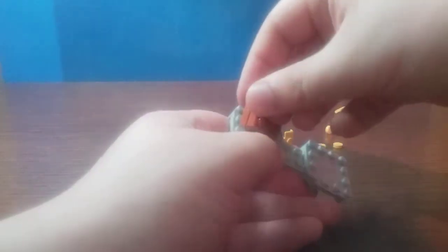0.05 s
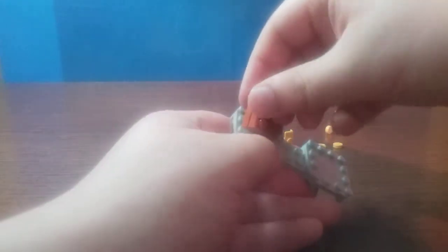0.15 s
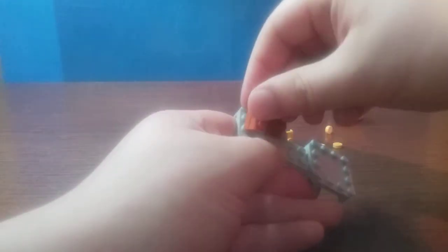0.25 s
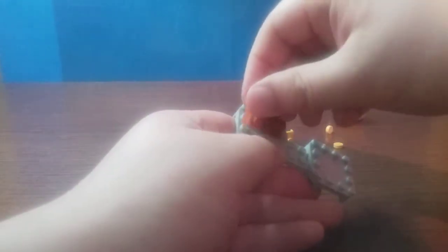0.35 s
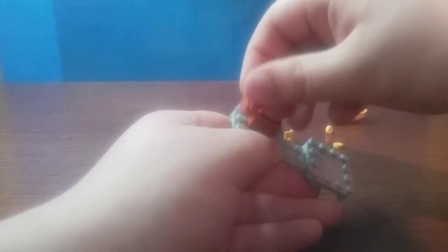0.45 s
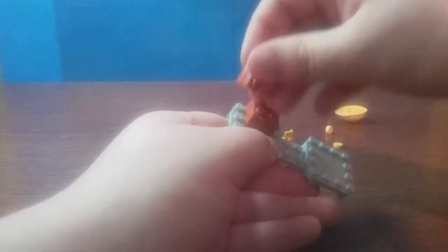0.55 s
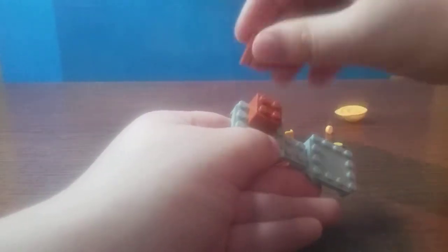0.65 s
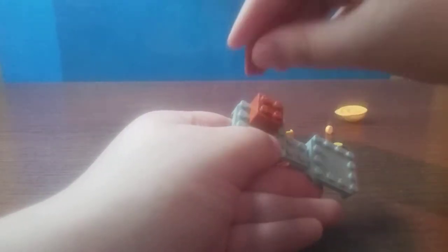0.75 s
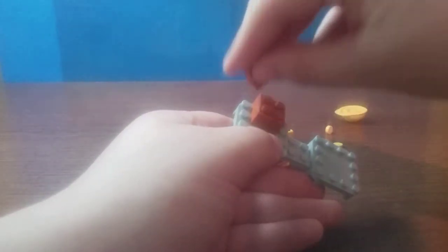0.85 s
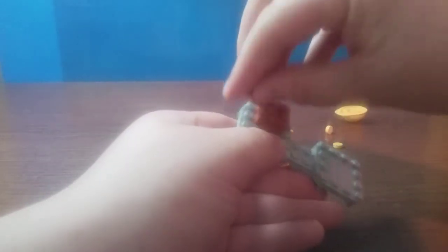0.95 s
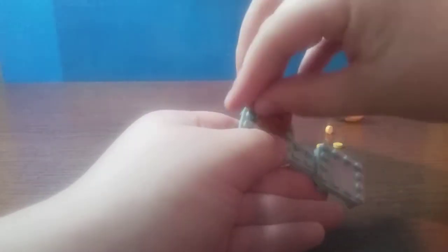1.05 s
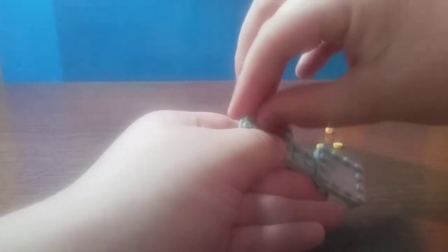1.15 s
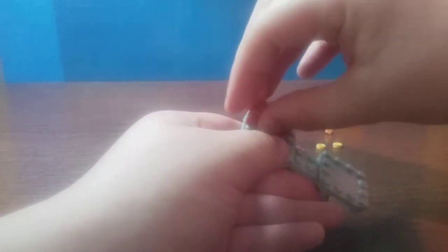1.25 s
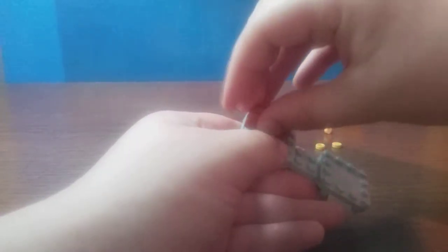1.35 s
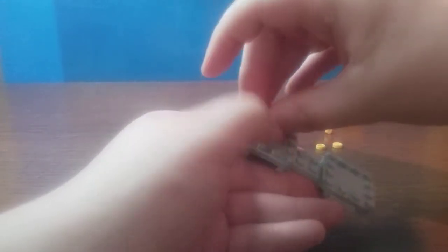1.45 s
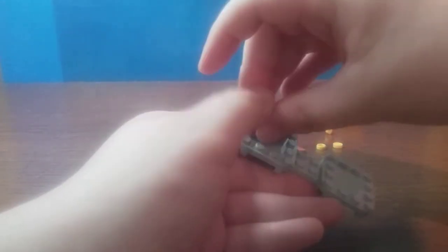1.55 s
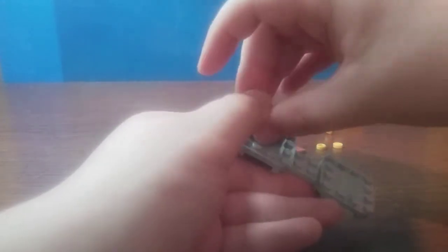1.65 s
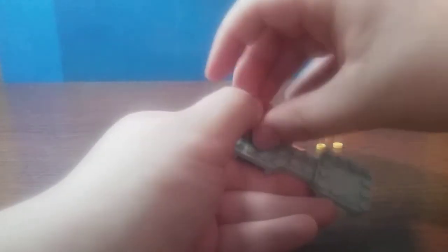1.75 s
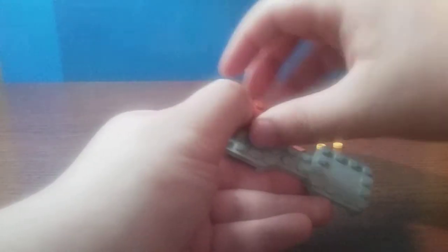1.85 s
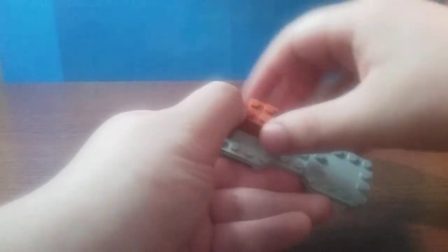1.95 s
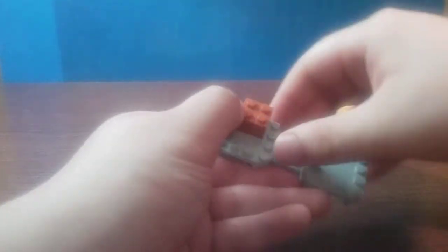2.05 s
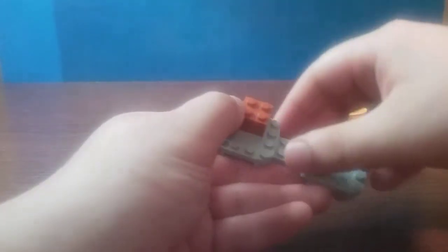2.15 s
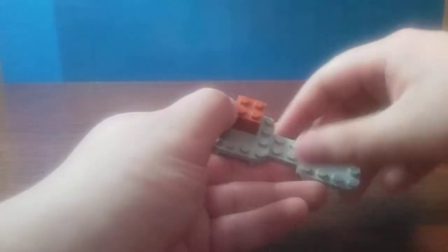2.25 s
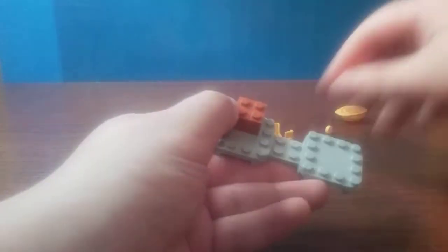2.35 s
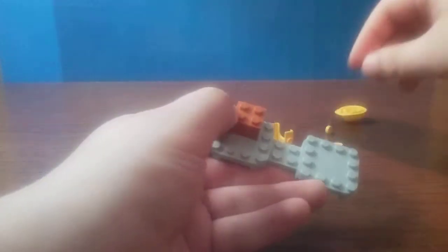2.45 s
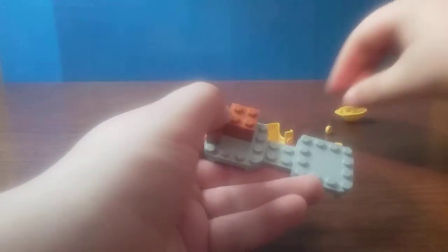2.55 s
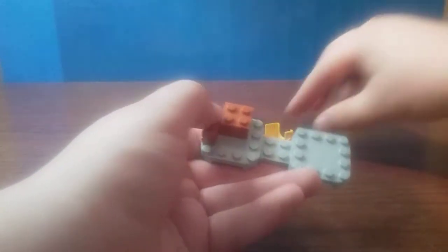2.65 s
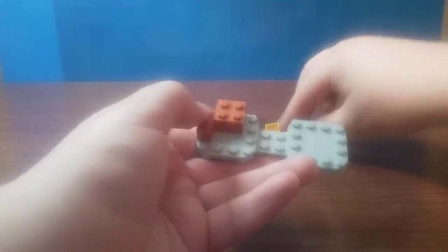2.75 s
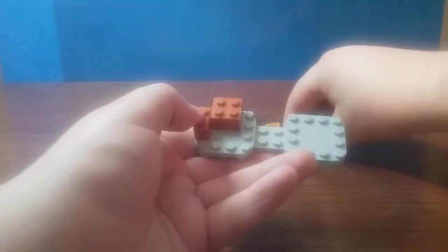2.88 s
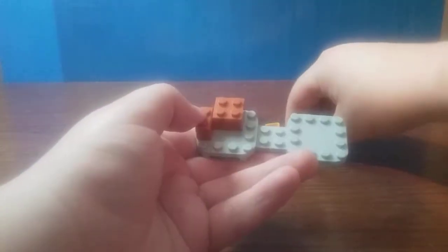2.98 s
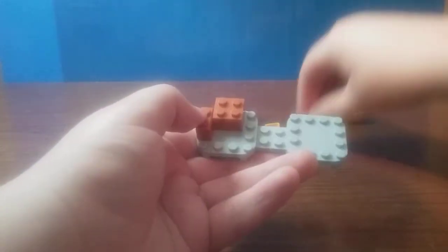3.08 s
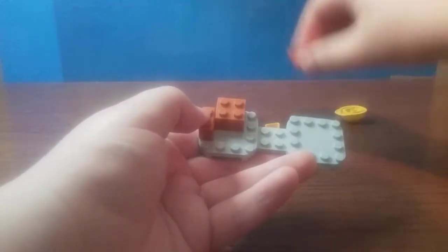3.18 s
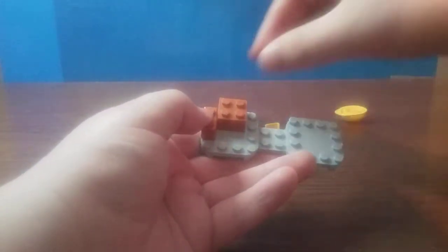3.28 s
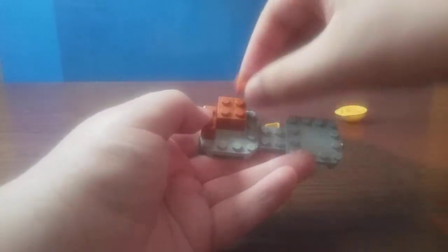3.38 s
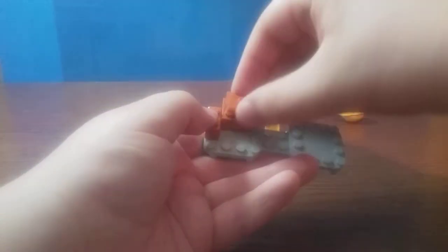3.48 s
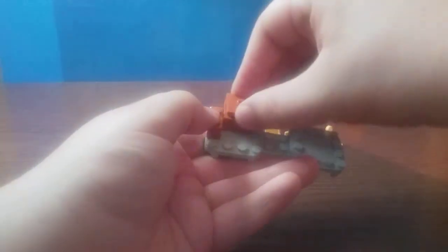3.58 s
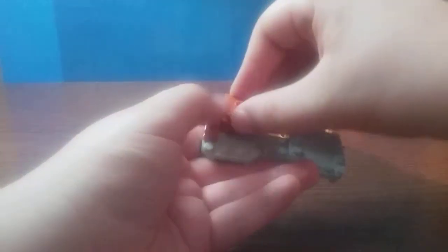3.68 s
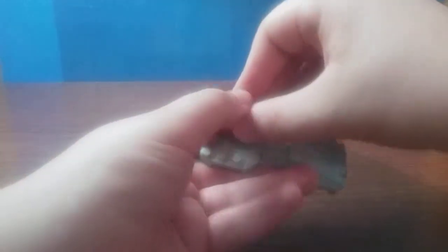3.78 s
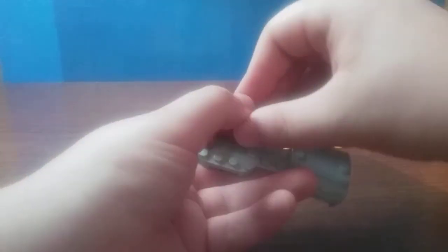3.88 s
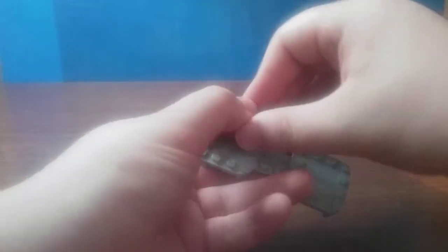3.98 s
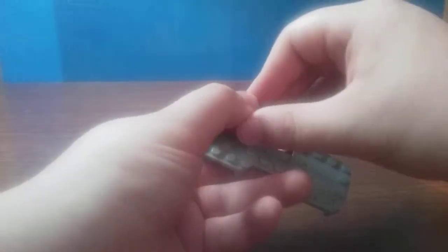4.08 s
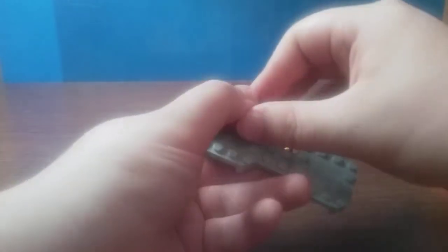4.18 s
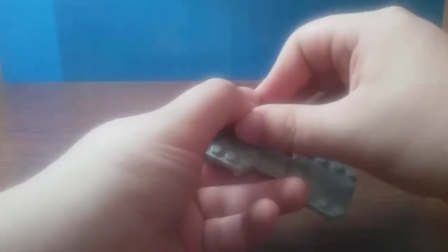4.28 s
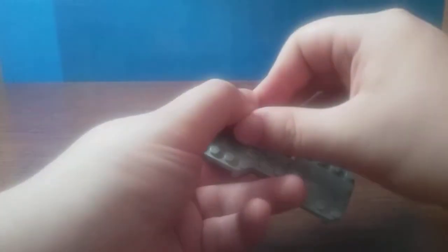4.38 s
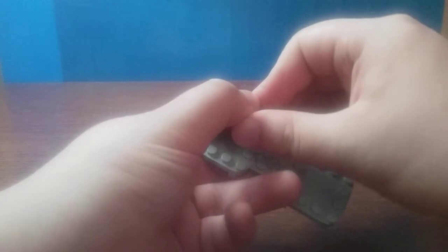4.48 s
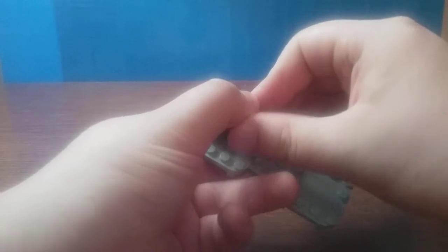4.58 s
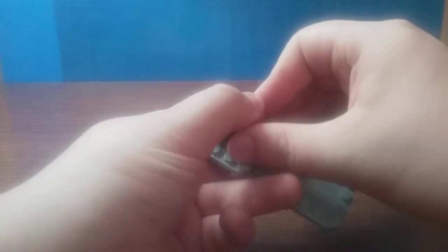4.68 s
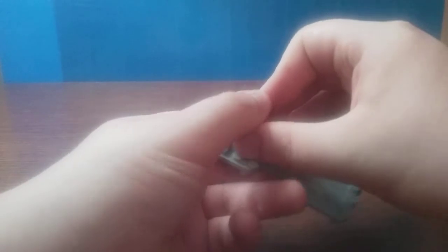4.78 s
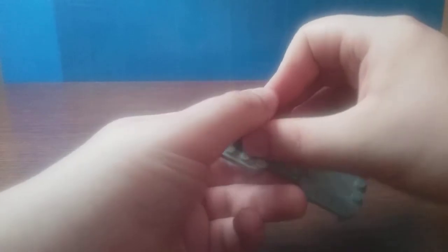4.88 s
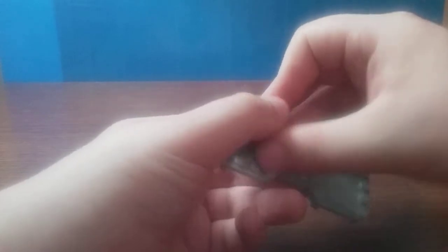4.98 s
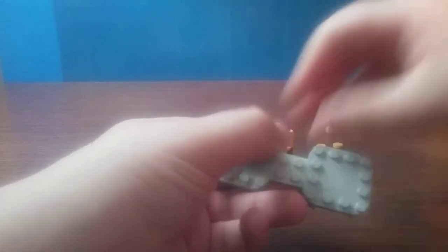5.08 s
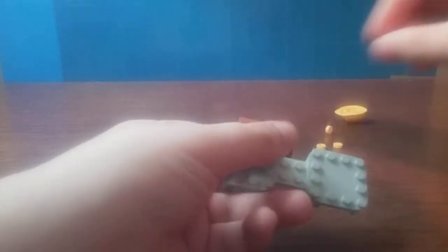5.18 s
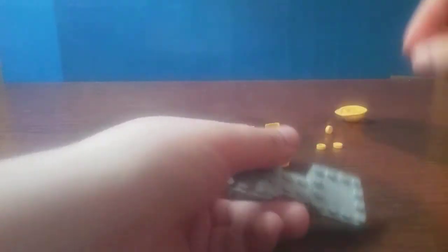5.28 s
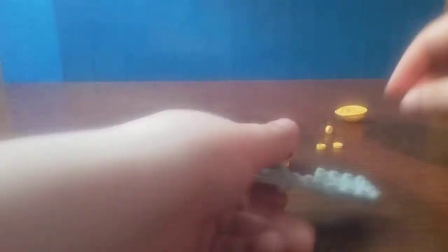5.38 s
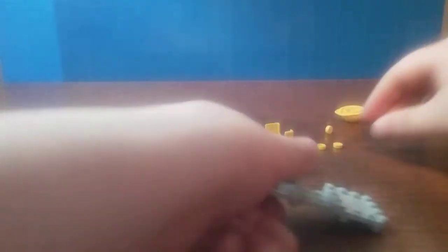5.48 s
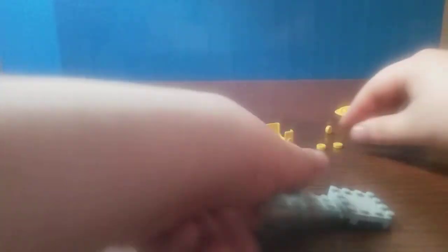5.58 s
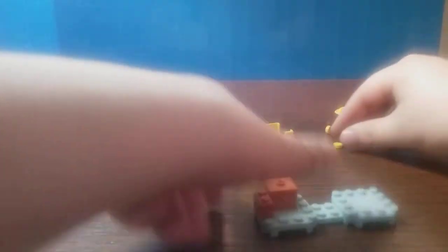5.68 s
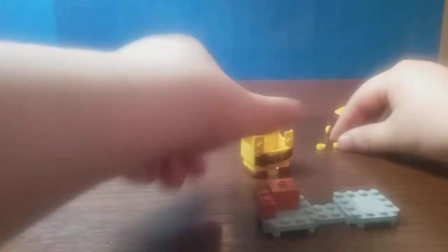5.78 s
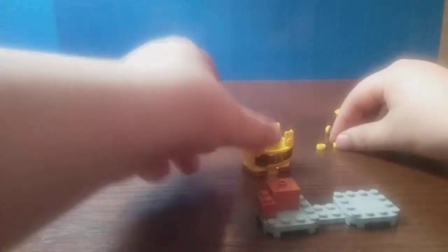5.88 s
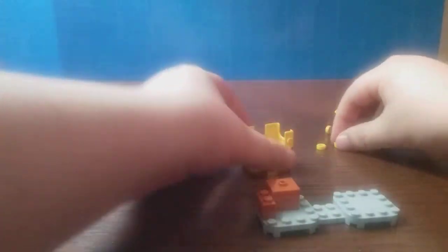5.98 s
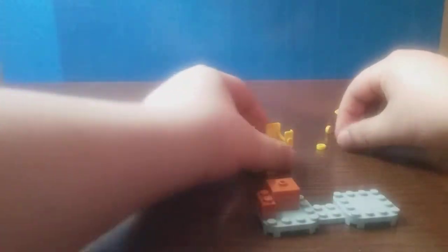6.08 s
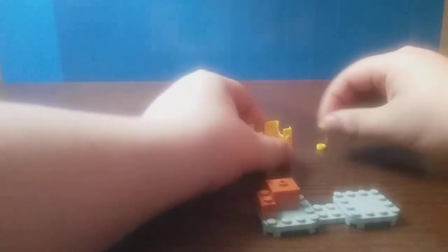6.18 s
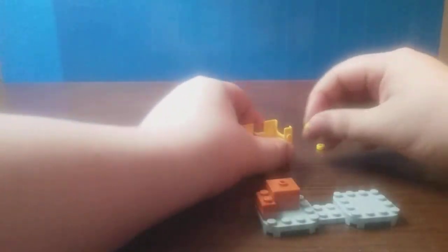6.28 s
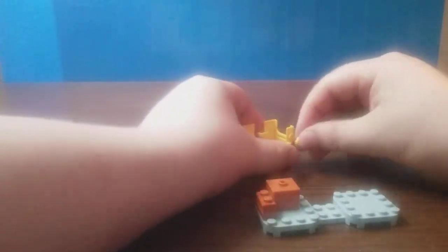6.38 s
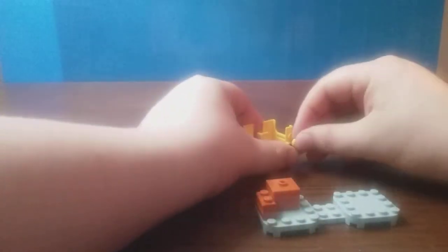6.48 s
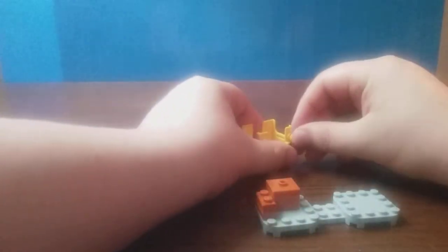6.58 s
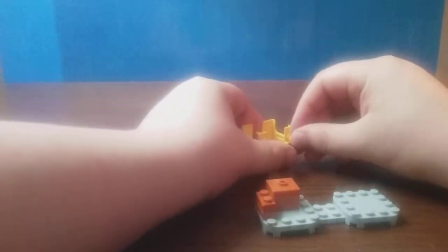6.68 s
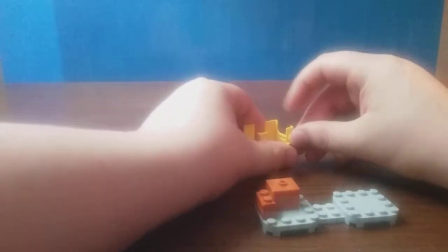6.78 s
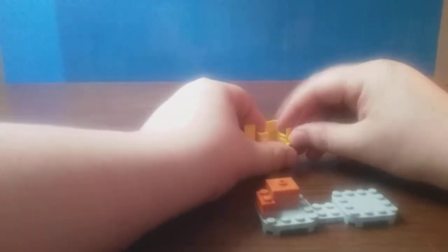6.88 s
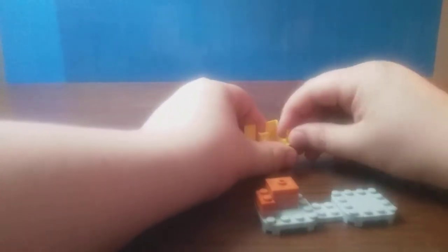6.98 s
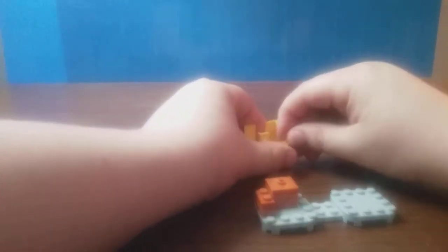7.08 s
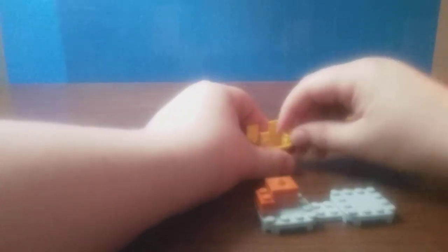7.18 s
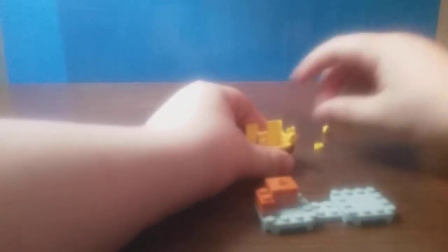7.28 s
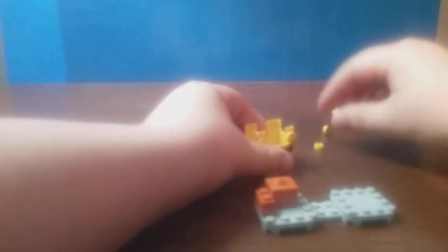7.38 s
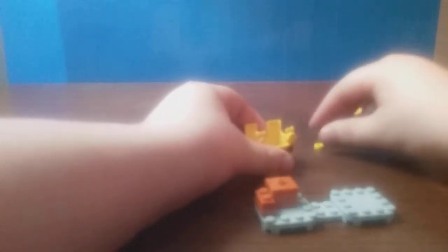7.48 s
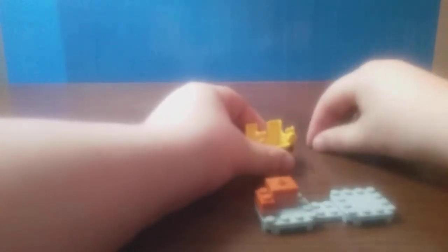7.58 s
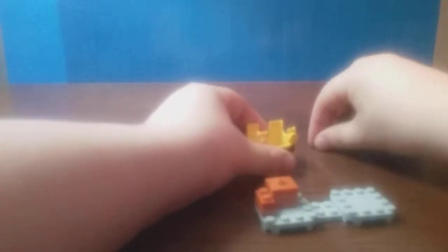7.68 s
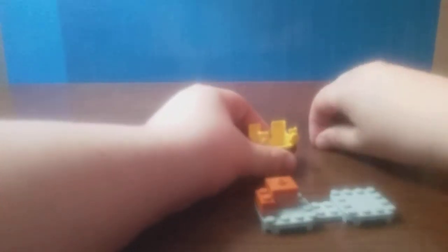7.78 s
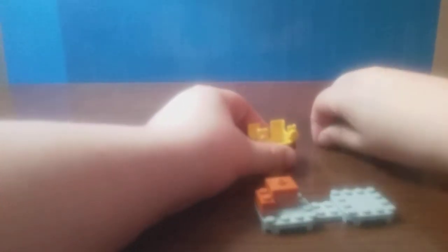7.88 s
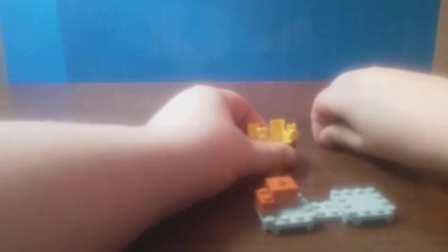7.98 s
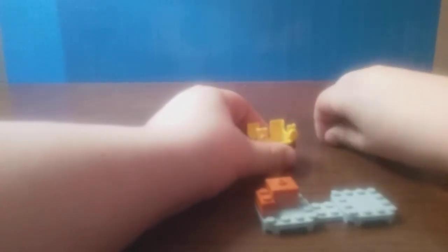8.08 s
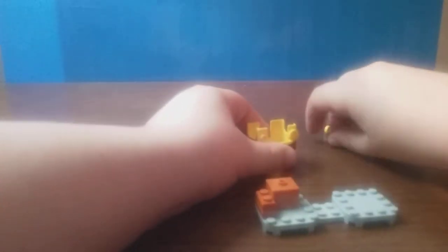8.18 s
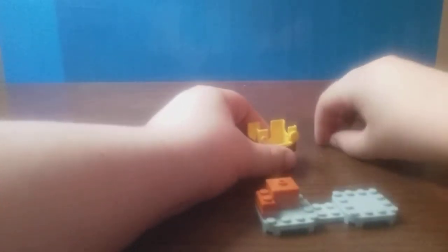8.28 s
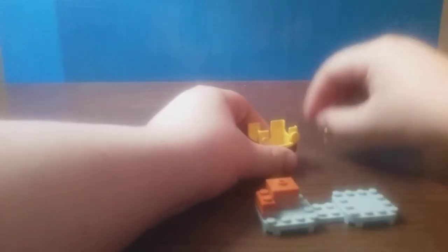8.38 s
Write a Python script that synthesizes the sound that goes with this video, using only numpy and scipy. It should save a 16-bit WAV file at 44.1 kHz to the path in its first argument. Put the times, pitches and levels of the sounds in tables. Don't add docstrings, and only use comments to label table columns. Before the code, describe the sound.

Close on a wooden table in a small room, hands join small plastic bricks with sparse, bright snaps and faint ticks. A firm double click seats a stud midway. Then a flat piece smacks down and a taller one lands, rocks and bounces in a quick, loud clatter. Afterwards come low forearm thumps, a few clicks, nudges and dull finger knocks over soft hiss and a barely audible hum.

```python
import sys
import numpy as np
from scipy import signal
from scipy.fft import rfft, irfft, next_fast_len
from scipy.io import wavfile
from scipy.ndimage import uniform_filter1d, map_coordinates

SR = 44100
rng = np.random.default_rng(int(sys.argv[2]) if len(sys.argv) > 2 else 0)


def to_wav(s):
    ch = np.atleast_2d(s).T
    pcm = np.round(np.clip(ch, -1, 1) * 32767)
    wavfile.write(sys.argv[1], SR, pcm.astype(np.int16))


def volts_from_db(level):
    exponent = np.asarray(level, float) / 20
    return 10 ** exponent


N = 372202
SIZE = 16384

# freq_hz, density_db
HISS = [(12, -40.5), (30, -24), (55, 4), (120, -9), (250, -10), (500, -13.5), (1000, -17), (2200, -20),
        (4000, -24.5), (7500, -31), (10500, -31.5), (14500, -28), (15700, -28.5), (16100, -71)]
# freq_hz, rms_db, waver_hz
HUM = [(55, -86.5, 6.9), (118, -85, 5.1), (237.6, -80.5, 3.1), (474, -89, 4.2)]
# freq_hz, t60_s
ROOM_DECAY = [(150, 0.12), (1000, .22), (5000, 0.15), (8000, 0.19), (15000, 0.12)]
# freq_hz, level_db
WALLS = [(300, 6.5), (1500, -1.5), (3200, -2), (5200, -6.5), (8000, -7.5), (15000, -8)]
# t60_s, over_late_tail_db
EARLY = (0.024, 3)

# freq_hz, width_hz, level_db
HOLLOW = [(1180, 600, -12), (1750, 400, -5), (2140, 500, -0.5), (2650, 400, -0.5), (3280, 1100, 2.5)]
# freq_hz, width_hz, level_db
SHELL = [(4160, 1000, -11), (5300, 1500, -4.5), (6420, 1270, -16), (7600, 3600, -20.5)]
# freq_hz, width_hz, level_db
EDGE = [(8300, 1200, -6.5), (11100, 3000, 5.5), (13900, 3500, 8)]
# freq_hz, width_hz, level_db
STUD = [(2600, 370, -8.5), (3850, 750, -6), (6660, 1400, -1.5), (7940, 1000, -7)]
# freq_hz, width_hz, level_db
PLATE = [(1370, 51, -15), (2670, 110, -12), (3170, 49, -3), (4700, 26, -7.5), (4530, 22, -12),
         (5150, 73, 2.5), (5645, 34, -8.5), (6350, 24, -10.5)]
# freq_hz, width_hz, level_db
TALL_PIECE = [(851, 39, -15), (2000, 36, -13.5), (3740, 110, -3), (3870, 32, -9), (4420, 48, -1.5),
              (4840, 44, 2.5), (5080, 62, -1.5), (5150, 15, -1), (5540, 200, 1.5), (8200, 280, -16.5),
              (12600, 1300, -32), (1050, 120, -17.5)]
# freq_hz, width_hz, level_db
WALLED = [(1090, 160, -7.5), (1460, 100, -8), (1700, 50, -11), (2730, 100, -19), (3180, 230, 3),
          (3600, 180, 3), (5160, 230, -3.5)]
# freq_hz, width_hz, level_db
WOOD = [(142, 43, 1.5), (222, 54, -9), (301.5, 70, -6.5), (398, 65, -6.5), (525, 90, -10),
        (863, 133, -12.5), (1075, 190, -13), (1404, 240, -16.5)]

# start_s, peak_db, strongest_mode_hz, body_db, brightness_db
SNAPS = [(0.3024, -46, 5260, -26, -38), (0.5937, -47.5, 4460, -48, -24), (0.971, -40.5, 3850, -12, -33),
         (1.0318, -38.5, 3980, -21, -48), (1.062, -25, 5420, -26, -55), (1.132, -41, 5270, -38, -32),
         (1.4407, -26, 5200, -20, -28.5), (1.4478, -35, 5400, -26, -35), (1.4602, -40, 5360, -39, -39),
         (2.0178, -50.5, 6500, -24, -37), (2.1302, -43, 4540, -33, -27),
         (3.5179, -30.5, 5140, -16.5, -25.5), (3.5562, -44, 5900, -22, -26),
         (3.6056, -41.5, 3840, -17, -25), (3.9545, -45, 4750, -37, -33),
         (6.6482, -37.5, 4770, -19.5, -23.5), (6.781, -40, 4960, -17, -28),
         (6.7989, -28.5, 4710, -18.5, -17), (6.8084, -32, 5150, -17.5, -11),
         (7.2802, -43.5, 5980, -20.5, -19), (7.9718, -42, 6000, -23, -25.5)]
# start_s, peak_db, strongest_mode_hz
TICKS = [(0.399, -55, 5550), (0.4103, -53, 5400), (0.5305, -58.5, 4400), (0.5594, -72, 4640),
         (0.6076, -56, 3860), (0.799, -65, 4500), (1.1694, -57, 5240), (1.78, -66, 5160),
         (2.509, -61, 2650), (2.7994, -66, 4500), (2.9294, -60, 6100), (3.6954, -62, 3380),
         (3.7114, -58, 5500), (3.9714, -54, 4870), (4.799, -62, 3400), (4.937, -61, 4950),
         (5.1483, -59, 5300), (5.2387, -64, 5660), (8.0219, -54.5, 5150)]
# body_db, brightness_db, chatter_ms
TICK = (-24, -23, 4.4)
# start_s, peak_db, mode_hz, skid_ms
SKIDS = [(0.522, -66, 4420, 50), (0.6, -57, 4320, 25), (0.632, -62.5, 5020, 77), (1.142, -67, 5300, 64),
         (1.29, -69, 5300, 30), (3.985, -63.5, 5200, 66), (5.39, -55.5, 4900, 56), (5.445, -53, 3600, 50),
         (5.678, -49, 4000, 40), (6.19, -56, 1650, 30), (6.305, -57.5, 1700, 40)]
# body_db, brightness_db
SKID = (-31, -33.5)
# peak_s, rise_s, fall_s, level_db, hollow_db
RUBS = [(0.59, 0.041, 0.046, -72.5, -32), (1.002, .012, .02, -76, -10), (1.21, .1, .08, -81, -15),
        (1.31, .04, .02, -83, -18), (5.154, .06, .05, -75, -17), (5.246, .04, .04, -80.5, -9),
        (5.41, 0.096, .04, -71.5, -20), (5.465, 0.057, 0.045, -63, -11), (5.685, 0.015, .035, -58.5, -2),
        (6.172, .016, .06, -72.5, 5), (6.226, .015, 0.0804, -75.5, 7.5)]
# peak_s, rise_s, fall_s, level_db, plastic_db
SWIPES = [
    (7.24, 0.024, .04, -75.5, 3),
]
# freq_hz, density_db
SCUFF = [(1500, -58.5), (2500, -8.5), (3400, -5.5), (5240, -0.5), (7000, -13.5), (9000, -50)]
# freq_hz, density_db
SCRAPE = [(500, -50.5), (1100, -5.5), (1750, -1), (2400, -10), (4000, -51.5)]
# freq_hz, density_db
SWISH = [(6000, -35), (8000, -1.5), (15000, -0.5), (16500, -28)]
# start_s, peak_db, hardness_db
TAPS = [(1.031, -61, -3), (2.017, -55, -22), (2.125, -52.5, -11), (2.921, -59.5, -24), (4.272, -49, 3),
        (5.408, -55, -24), (5.514, -40.5, -4), (5.712, -24.5, 6), (5.767, -30, -6), (5.809, -34.5, 2.5),
        (5.832, -39, -2), (6.014, -59, -26), (6.084, -55, -26.5), (6.161, -54, 13), (6.221, -60, -3),
        (6.798, -52.5, -1), (7.071, -39, -12), (7.169, -57, -11.5), (7.241, -57.5, -14), (7.28, -56.5, 2),
        (7.507, -49, 1), (7.574, -58.5, 8.5), (7.647, -42.5, -18), (7.74, -45, -18), (7.792, -53, -19),
        (8.022, -60, -23), (8.087, -53, -19), (8.162, -55, -29), (8.256, -53.5, -20.5)]
# peak_s, rise_s, fall_s, rumble_db, roughness_db
DRAGS = [(3.43, .01, 0.11, -44.5, -11), (3.64, 0.07, 0.082, -45, -9.5), (3.805, 0.016, 0.028, -50, -11),
         (3.848, 0.011, 0.047, -48.5, -15), (5.42, 0.031, 0.065, -59, -9), (5.54, .05, 0.064, -54.5, -1),
         (5.73, .015, 0.12, -50.5, -14), (6.05, 0.11, .1, -64, -10), (6.567, .022, 0.12, -41.5, -10),
         (6.71, 0.027, 0.041, -41, -19), (6.77, 0.021, 0.017, -30.5, -9), (6.81, 0.019, 0.045, -46, -11),
         (6.916, 0.044, 0.064, -35, -9), (7.09, 0.077, 0.053, -53.5, -9), (8.33, .025, 0.031, -43, -27),
         (8.41, .025, .09, -51.5, -9)]
# freq_hz, density_db
PUSH = [(20, -58), (40, -9), (75, 5.5), (150, -2.5), (250, -21.5), (400, -59), (800, -150)]
# freq_hz, density_db
GRIT = [(100, -39), (200, -7), (300, -10), (600, -32.5), (900, -65.5), (1500, -150)]
# start_s, peak_db, strongest_mode_hz, body_db, brightness_db
SEATS = [
    (4.2444, -28, 5000, -36, -22),
    (4.2740, -23, 4680, -24, -24.5),
]
# start_s, peak_db, strongest_mode_hz, body_db
DROPS = [
    (5.5155, -8.5, 5150, -19),
    (5.5295, -24.5, 5150, -15),
    (5.7138, -4.5, 5070, -17),
    (5.7275, -12.5, 4540, -27.5),
    (5.7698, -10, 5550, -21),
    (5.8087, -13, 5450, -26.5),
    (5.8309, -18, 4700, -14.5),
    (5.8444, -20.5, 4420, -25),
    (5.8574, -28.5, 5190, -26),
]
# start_s, peak_db, strongest_mode_hz, chatter_ms
NUDGES = [
    (6.162, -53, 3430, 5.2),
    (6.2222, -46, 1750, 5),
    (6.2594, -65, 2795, 4),
    (6.2994, -59.5, 3130, 7),
    (7.0757, -28, 4700, 9.4),
    (7.5088, -46, 2730, 11),
    (7.5747, -53.5, 3180, 4.9),
]
# body_db, brightness_db
NUDGE = (-15, -18)


def unit(x):
    return x / np.sqrt(np.mean(x ** 2) + 1e-20)


def along(points, hz):
    f, v = np.transpose(points)
    return np.interp(np.log(hz + 1), np.log(f + 1), v)


def wobble(rate):
    knots = rng.standard_normal(int(N * rate / SR) + 4)
    return map_coordinates(knots, [np.arange(N) * rate / SR])


def coloured(x, spectrum):
    m = next_fast_len(N + 8192)
    gain = volts_from_db(along(spectrum, np.fft.rfftfreq(m, 1 / SR)))
    return unit(irfft(rfft(x, m) * gain, m)[:N])


def room_tone():
    t = np.arange(N) / SR
    tone = volts_from_db(-70 + 0.4 * wobble(3.7)) * coloured(rng.standard_normal(N), HISS)
    for hz, db, waver_hz in HUM:
        cycles = hz * t + waver_hz * np.cumsum(wobble(7.8)) / SR
        tone += volts_from_db(db + 5 + 0.73 * wobble(9.5)) * np.sin(2 * np.pi * cycles)
    return tone


def room():
    hz, t, z = signal.stft(rng.standard_normal(SR // 3), SR, nperseg=64)
    early_t60, early_db = EARLY
    late = volts_from_db(-60 * t / along(ROOM_DECAY, hz)[:, None])
    decay = late + volts_from_db(early_db - 60 * t / early_t60)
    tail = signal.istft(z * volts_from_db(along(WALLS, hz))[:, None] * decay, SR, nperseg=64)[1]
    gap = round(0.002 * SR)
    return np.pad(tail / np.linalg.norm(tail), (gap, SIZE - gap - len(tail)))


def power(modes):
    f = np.fft.rfftfreq(SIZE, 1 / SR)
    centre, width, db = np.transpose(modes)[:, :, None]
    damping = (f * width) ** 2
    one = damping / ((centre * centre - f * f) ** 2 + damping)
    uneven_db = 1.5 * rng.standard_normal(centre.shape)
    return (volts_from_db(2 * (db + uneven_db)) * one ** 2).sum(axis=0)


def causal(energy):
    c = irfft(0.5 * np.log(energy + 1e-12), SIZE)
    c[1:SIZE // 2] *= 2
    c[SIZE // 2 + 1:] = 0
    return np.exp(rfft(c))


def add(track, s, sound):
    track[round(s * SR):][:len(sound)] += sound


def contact(own, wet_db, hz, body_db, bright_db, chatter_ms, narrow_db=0):
    t, f = np.arange(SIZE) / SR, np.fft.rfftfreq(SIZE, 1 / SR)
    fade = volts_from_db(-20 * t / (0.0011 * max(chatter_ms, 0.3))) + 0.99 * volts_from_db(-20 * t / 0.0015)
    force = rng.standard_normal(SIZE) * fade * (1 - np.exp(-t / 0.0004))
    force = force / np.linalg.norm(force)

    shell = volts_from_db(-5 - 2 * narrow_db) * power(SHELL) + power([(hz, 620, 0)])
    shell = shell + volts_from_db(2 * body_db + 8) * power(HOLLOW)
    dull_hz = 11100 + 93 * bright_db
    energy = shell / (0.5 + (f / dull_hz) ** 8) + volts_from_db(2 * bright_db - 12) * power(EDGE)
    grip = map_coordinates(rng.standard_normal(256), [np.minimum(f / 351, 255)])
    energy = energy * volts_from_db(2 * 3.5 * grip) + own

    even = np.sqrt(np.abs(uniform_filter1d(energy, size=45)))
    x = irfft(rfft(force) * causal(energy) + volts_from_db(wet_db) * rfft(room()) * even, SIZE)
    return x / np.abs(x).max()


def click(track, s, db, own, *settings):
    add(track, s - 0.0005, volts_from_db(db + 0.5) * contact(own, -4, *settings))


def snaps():
    out = np.zeros(N + SR)
    for s, db, hz, body_db, bright_db in SNAPS:
        click(out, s, db, 0, hz, body_db, bright_db, 4)
    return out[:N]


def ticks():
    out = np.zeros(N + SR)
    for s, db, hz in TICKS:
        click(out, s, db, 0, hz, *TICK, 4)
    return out[:N]


def skids():
    out = np.zeros(N + SR)
    for s, db, hz, skid_ms in SKIDS:
        click(out, s, db, 0, hz, *SKID, skid_ms, 4)
    return out[:N]


def slips(rate, spread_db):
    happens = rng.random(N) < rate / SR
    return happens * rng.choice([-1, 1], N) * volts_from_db(spread_db * rng.standard_normal(N))


def strokes(rows):
    peak, rise, fall, db, second_db = np.transpose(rows)[:, :, None]
    t = np.arange(0, N, 32) / SR
    span = np.maximum(np.where(t < peak, rise, fall), 0.005)
    gain = volts_from_db(db - 14.5 * ((t - peak) / span) ** 2)
    return [np.interp(np.arange(N) / SR, t, g.sum(axis=0)) for g in (gain, gain * volts_from_db(second_db))]


def rub():
    level, hollow = strokes(RUBS)
    skin, plastic = strokes(SWIPES)
    grains = unit(slips(rate=2700, spread_db=5.5)) + 0.7 * rng.standard_normal(N)
    layers = (level + plastic) * coloured(grains, SCUFF)
    layers += (skin + level * volts_from_db(-25)) * coloured(grains, SWISH)
    layers += hollow * coloured(grains, SCRAPE)
    return volts_from_db(2.6 * wobble(60)) * layers


def taps():
    out, t = np.zeros(N + SR), np.arange(SIZE) / SR
    for s, db, hardness_db in TAPS:
        modes = []
        for hz, width, level in WOOD:
            height = np.clip(np.log2(hz / 145) / 3.2, 0, 1)
            modes.append((hz, width, level + (hardness_db + 15) * height))
        push = (t < 1 / SR) + 0.11 * rng.standard_normal(SIZE) * volts_from_db(-20 * t / 0.018)
        knock = irfft(rfft(push + volts_from_db(-1.5) * room()) * causal(power(modes)), SIZE)
        add(out, s + 0.0014, volts_from_db(db + 1.5) * knock / np.abs(knock).max())
    return out[:N]


def drag():
    low, rough = strokes(DRAGS)
    jerks = slips(rate=350, spread_db=3)
    lumps = volts_from_db(-5 + 3.5 * wobble(28))
    return low * coloured(jerks, PUSH) + rough * lumps * coloured(jerks, GRIT)


def seats():
    out = np.zeros(N + SR)
    for s, db, hz, body_db, bright_db in SEATS:
        click(out, s, db, power(STUD), hz, body_db, bright_db, 4.5)
    return out[:N]


def drops():
    out = np.zeros(N + SR)
    flat = (DROPS[:2], PLATE, 6, 7.7)
    tall = (DROPS[2:], TALL_PIECE, 2, 13)
    for rows, piece, ring_db, chatter_ms in (flat, tall):
        modes = [(f, 2 * width + 170, level + ring_db) for f, width, level in piece]
        for s, db, hz, body_db in rows:
            bright_db = -21 + 1.1 * db
            hit = contact(power(modes), -2, hz, body_db, bright_db, chatter_ms)
            add(out, s - 0.0005, volts_from_db(db) * hit)
    return out[:N]


def nudges():
    out = np.zeros(N + SR)
    for s, db, hz, chatter_ms in NUDGES:
        click(out, s, db, power(WALLED), hz, *NUDGE, chatter_ms, 4)
    return out[:N]


def scene():
    bricks = snaps() + ticks() + skids() + seats() + drops() + nudges()
    hands = rub() + taps() + drag()
    return (room_tone() + bricks + hands)[None]


def low_pass(x):
    return signal.sosfilt(signal.butter(12, 16710, fs=SR, output="sos"), x)


def record(dry):
    f = np.fft.rfftfreq(N, 1 / SR)
    bass_cut = (1j * f / (35 + 1j * f)) ** 2
    limited = irfft(rfft(dry) * (f < 16300) * bass_cut, N)
    return low_pass(limited - 0.0004)


dry = scene()
out = record(dry)
to_wav(out)
```